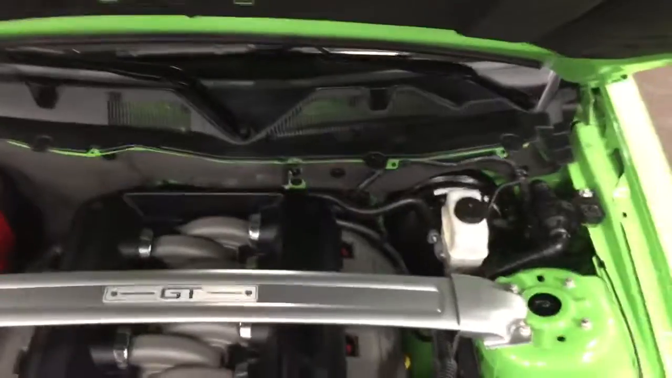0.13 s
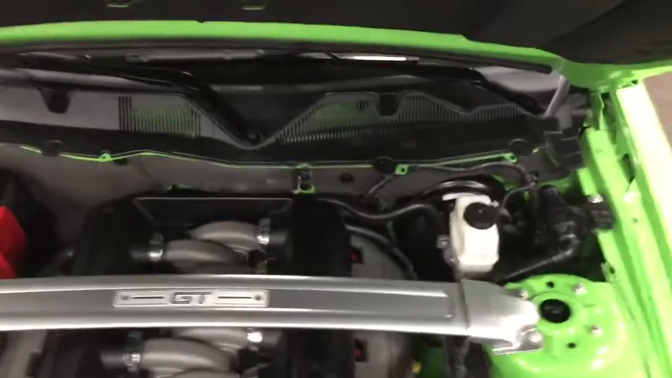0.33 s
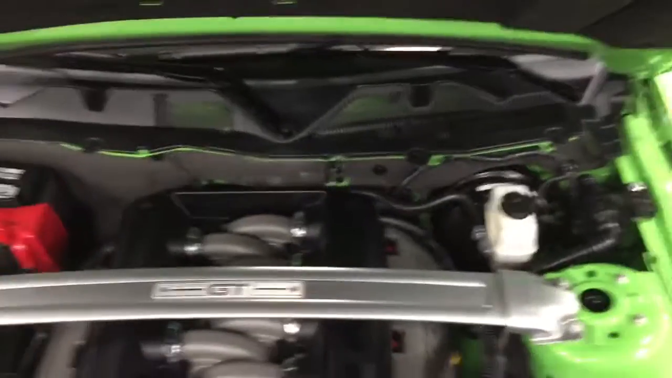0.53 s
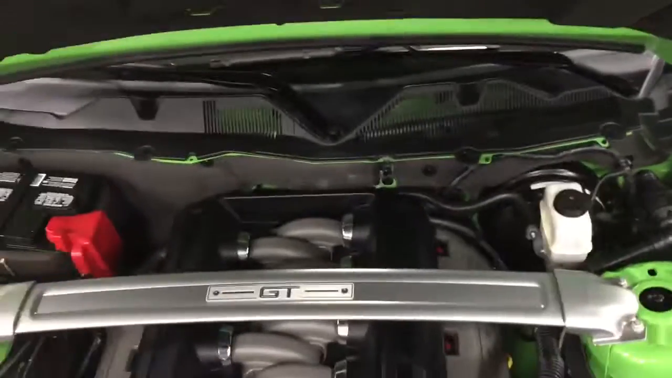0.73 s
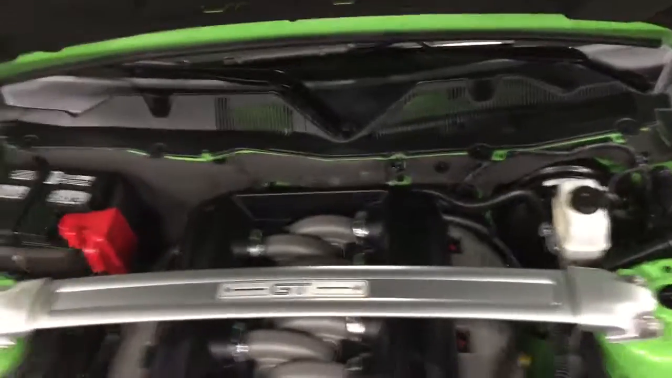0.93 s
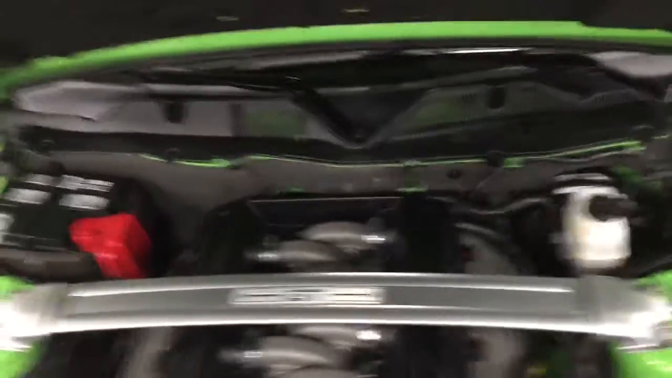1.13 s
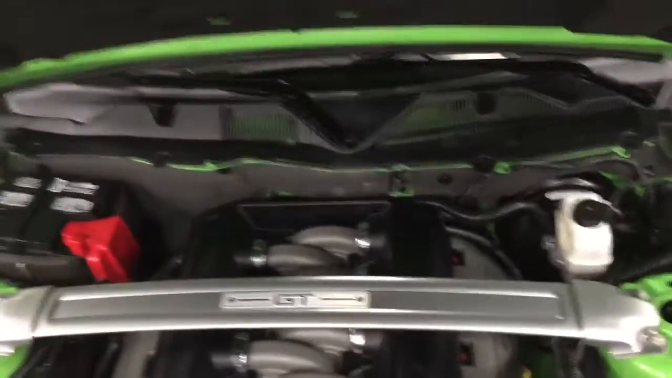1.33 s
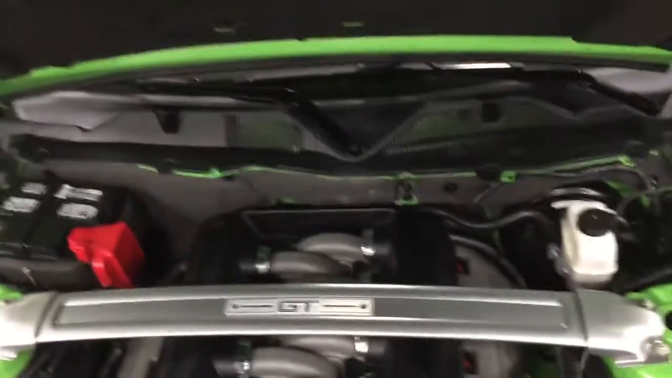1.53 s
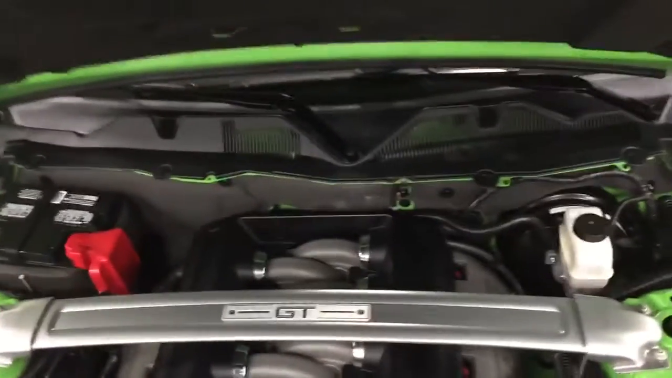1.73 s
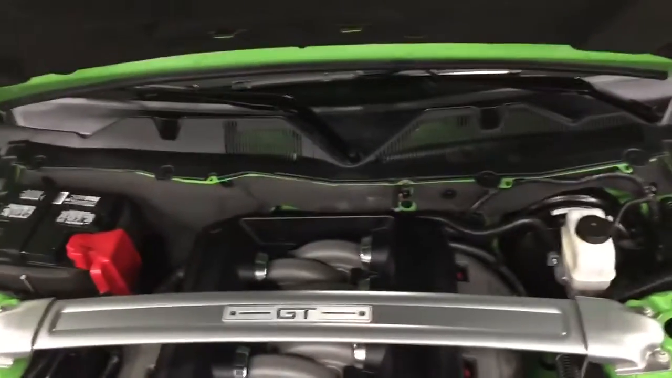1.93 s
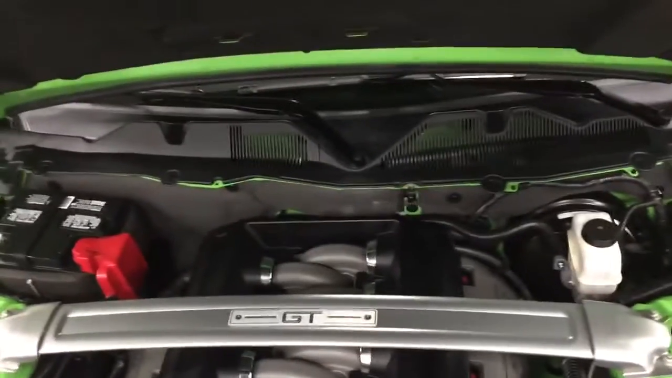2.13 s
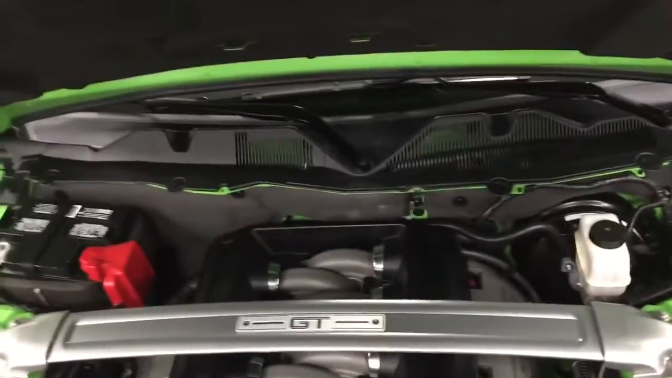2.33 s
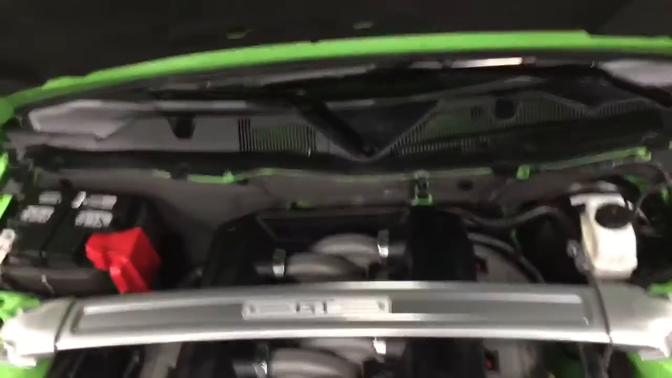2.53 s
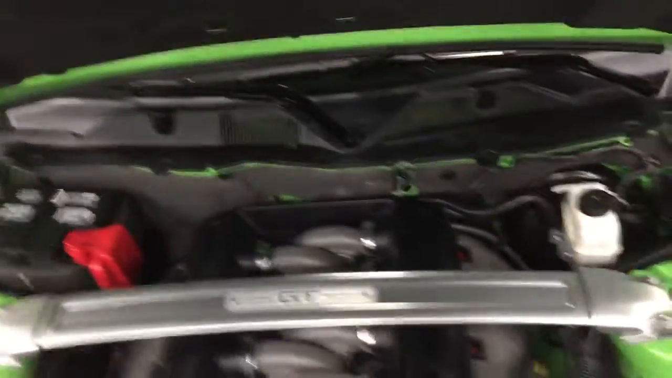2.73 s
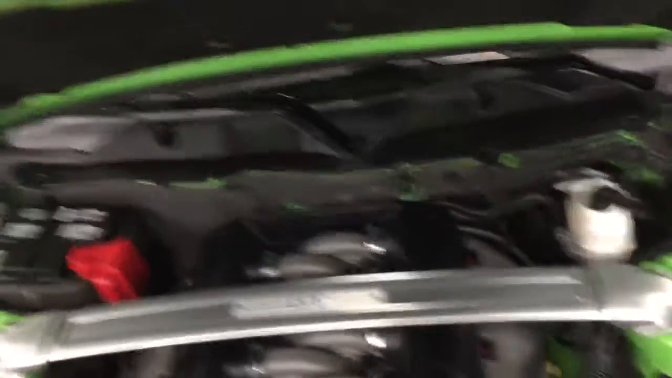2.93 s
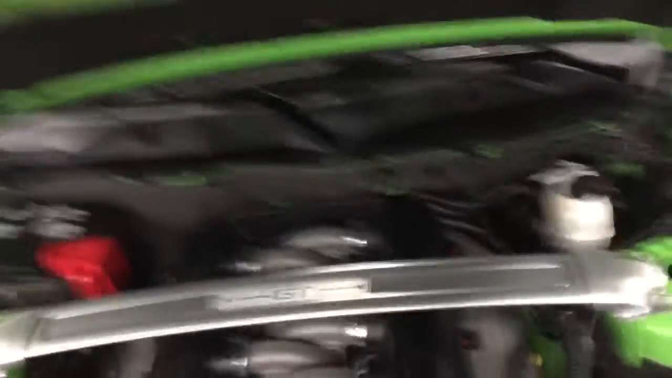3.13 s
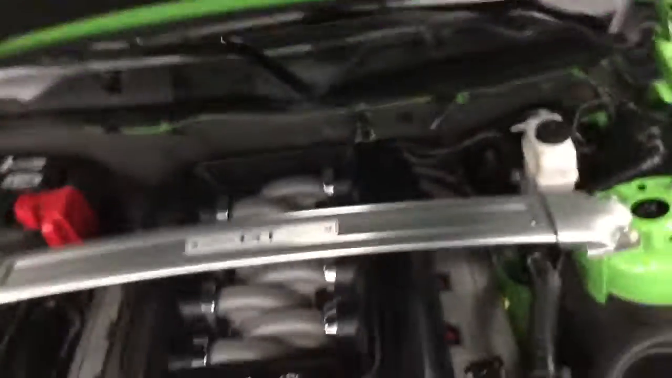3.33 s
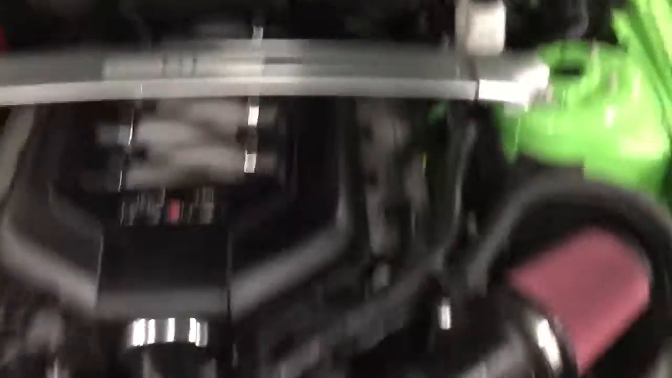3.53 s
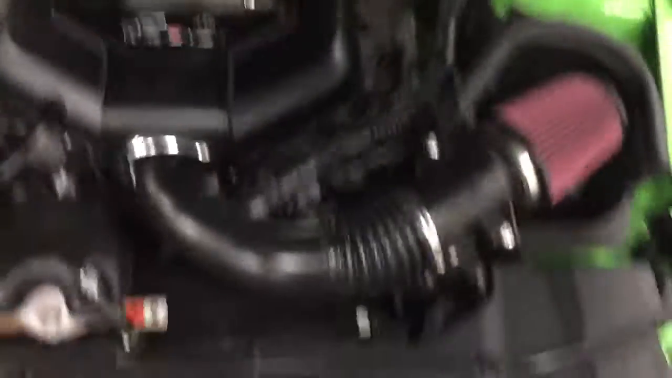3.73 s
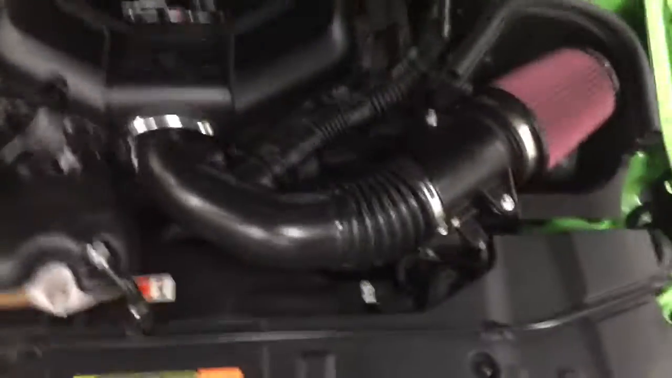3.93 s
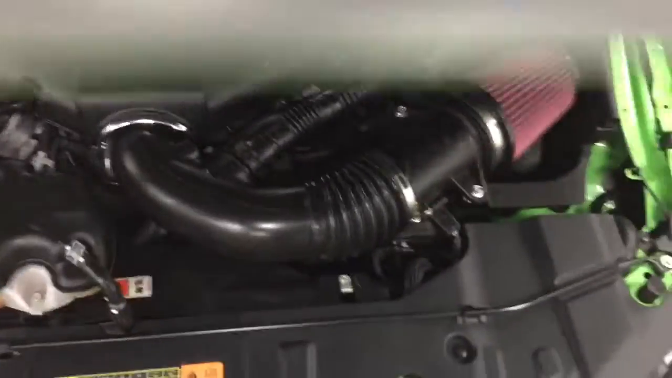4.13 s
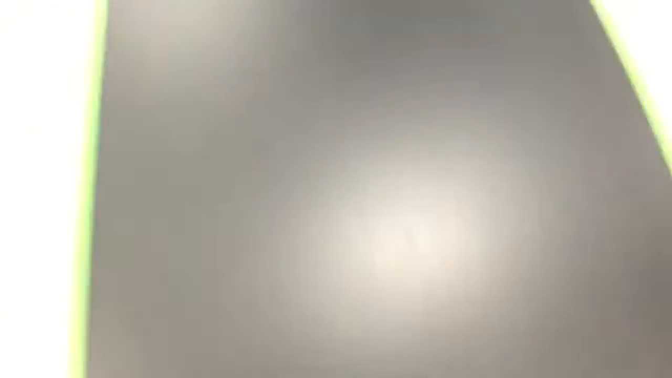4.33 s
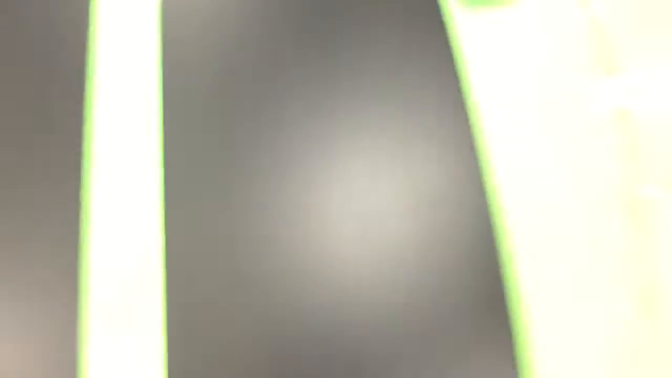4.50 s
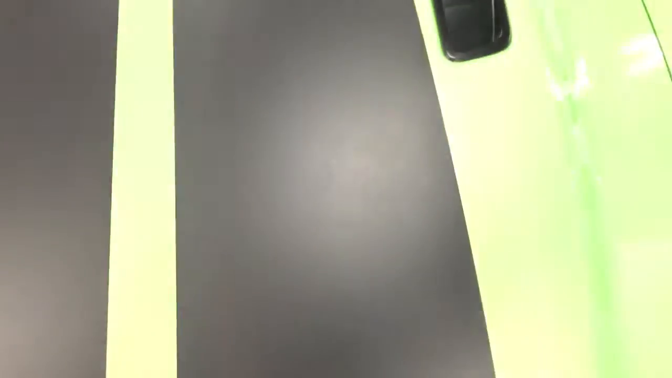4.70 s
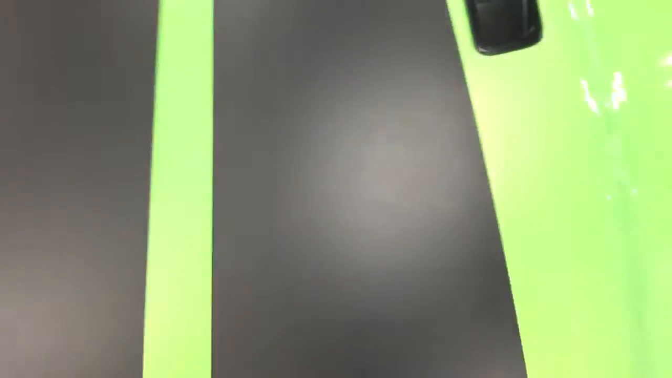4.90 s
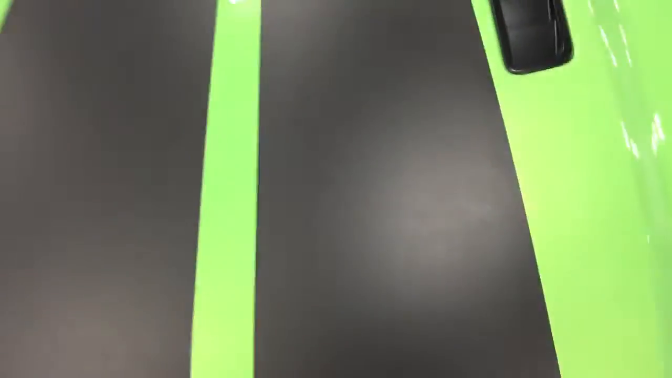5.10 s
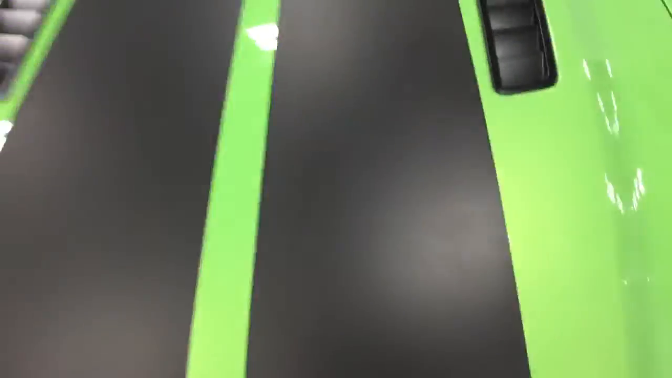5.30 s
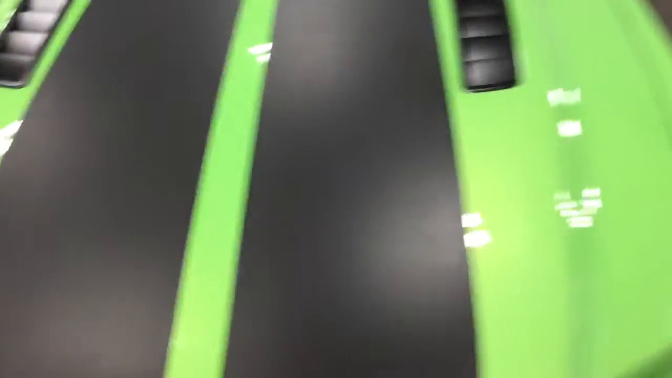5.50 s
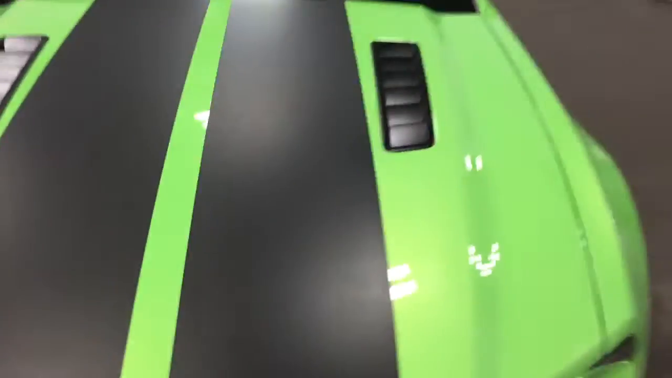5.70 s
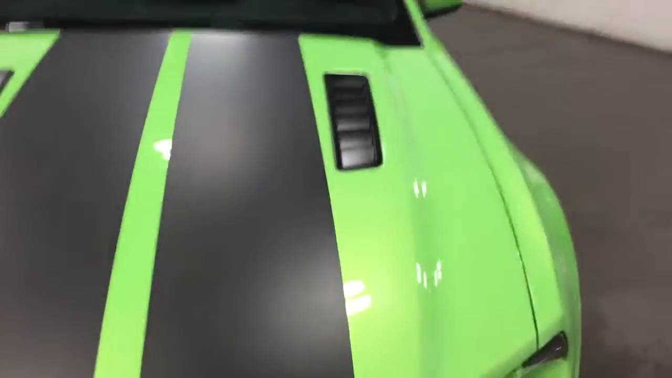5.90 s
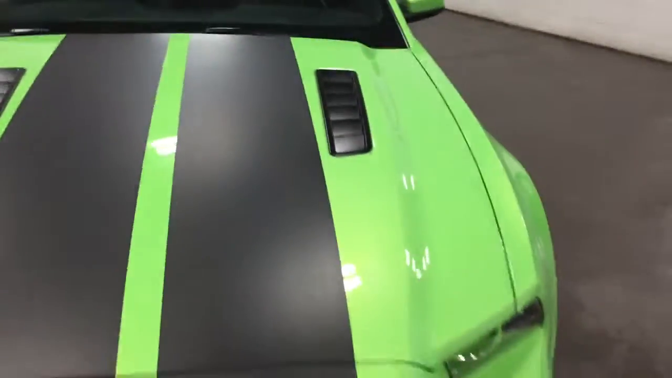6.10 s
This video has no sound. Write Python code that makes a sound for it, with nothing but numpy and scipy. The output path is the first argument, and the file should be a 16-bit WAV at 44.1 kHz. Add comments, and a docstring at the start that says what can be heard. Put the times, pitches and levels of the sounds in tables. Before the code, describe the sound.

A hand-held camera creaks and rubs softly for the first second or so, over the faint low rumble of a large, hard-walled showroom. From about 1.3 to 2.6 seconds a car's prop rod is unhooked and rattles into its holder: uneven, lightly ringing metal knocks with tiny scrapes and dull thumps of the hood panel, sharpest at 1.7 seconds and clustered around 2.2. Between about 2.8 and 4 seconds the fingers shift on the camera with small hollow ticks and rubs. At 4.6 seconds the hood falls with a slight low puff of air and slams onto its latch. This booming metal crash is by far the loudest sound and slightly overloads the microphone. Its echo fades over about a second, leaving quiet room tone and a couple of faint hand bumps around 6 seconds.

```python
"""A car hood is lowered and slammed in a large, hard-walled showroom, heard from a hand-held camera.
First the camera's case creaks and rubs in the hand. The prop rod is unhooked and rattles into its
holder, ringing and thumping the panel, and the fingers shift again. Then the hood falls with a puff
of air and crashes on its latch: the panel booms, the peaks overload and the gain ducks.
The hall rings on, swelling twice as the far walls answer, under a few last bumps of the hand."""
import sys
import numpy as np
from scipy import signal
from scipy.io import wavfile
from scipy.ndimage import uniform_filter1d

SR = 44100
rng = np.random.default_rng(int(sys.argv[2]) if len(sys.argv) > 2 else 0)


def digitize_waveform(pressure):
    """Quantize a signal to 16-bit integers and store it at the path in sys.argv[1].

    Rows of a 2-D input are taken as channels; values are limited to [-1, 1].
    """
    field = np.atleast_2d(pressure).T
    bounded = np.clip(field, -1, 1)
    quanta = np.round(bounded * 32767).astype(np.int16)
    wavfile.write(sys.argv[1], SR, quanta)


N = 275757

# Levels are set ahead of the mix gains; each hit or rub scales its object's t60 by a ring factor.
# room tone, mostly low rumble: f/Hz, level/dB
ROOM_TONE_EQ = [(15, -35), (25, -13.5), (55, -6), (82, -11), (190, -12), (242, -7), (270, -20.5),
                (416, -25), (531, -29.5), (775, -26.5), (1560, -31), (14400, -51), (16000, -50)]
# tone of the reverb: f/Hz, level/dB
HALL_EQ = [(30, -5.5), (55, 2), (110, 4), (220, -4.5), (550, -8), (1000, -4.5), (1600, 3.5), (2600, 2),
           (4000, 1.5), (7000, -1), (10000, -2.5), (15000, -11)]
# reverb time: f/Hz, t60/s
HALL_DECAY = [(60, 1.1), (200, 1.0), (550, .8), (1300, 1.1), (3000, 1.4), (5500, 1.3), (9000, 0.97),
              (15000, 0.81)]
# swells sent back by the far walls: delay/s, width/s, boost/dB
WALL_SWELLS = [(.3, .075, 2.5), (.69, .04, 4)]

# resonances of the camera's case: f/Hz, level/dB, t60/s
CASE_MODES = [(181, -10, 0.063), (264, -4, 0.066), (367, -5, 0.18), (565, -4, 0.1), (667, -6, 0.049),
              (960, -8.5, 0.017), (1170, -2, 0.078), (1734, -4, 0.041), (1970, -5.5, 0.017)]
# tone of a tick on the case: f/Hz, level/dB
CASE_EQ = [(50, -7), (160, 8), (400, -0.5), (1200, -3), (2200, -2), (2900, -18), (4300, -10), (5700, -21.5),
           (7200, -14.5), (10000, -26.5), (15000, -23.5)]
# noisy ring of the case: f/Hz, t60/s
CASE_DECAY = [(100, 0.53), (400, 0.2), (1200, 0.092), (2500, .035), (6000, 0.015), (15000, 0.019)]
# the case creaks in the hand: t/s, level/dB, relative treble/dB
CASE_CREAKS = [(.01, -31.5, -4.5), (.031, -24.5, -10.5), (.074, -25.5, -15), (0.162, -27, -6),
               (.254, -39, -36), (.385, -31.5, -11), (.468, -35, -21), (0.615, -35.5, -35),
               (.738, -42, -34), (.932, -46, -22), (1.04, -36.5, -26), (1.074, -33, -29),
               (1.16, -29, -23.5), (1.252, -39, -27), (1.269, -35, -33), (2.557, -33.5, -25),
               (2.828, -31.5, -46.5), (2.931, -39.5, -41), (3.114, -53, -24), (3.151, -36, -16),
               (3.253, -30, -6), (3.562, -25, -15), (3.568, -25, -16), (3.619, -47.5, -16),
               (3.757, -44, -25), (3.835, -44, -6), (3.858, -44, -16), (3.964, -49.5, -16)]
# fingers slip on the case: t/s, length/s, level/dB, slip rate/Hz, relative treble/dB
FINGER_SLIPS = [(0.0, 0.014, -44.5, 880, -12.5), (.04, 0.049, -41, 650, -9.5), (.166, 0.069, -44, 260, -11),
                (.62, 0.094, -48.5, 80, -42), (.745, .1, -50, 80, -49), (1.278, 0.064, -47.5, 200, -29),
                (3.262, 0.082, -50.5, 900, -12), (3.379, 0.05, -47.5, 890, -13.5),
                (3.438, 0.036, -52.5, 1010, -15), (3.47, 0.15, -57.5, 900, -17),
                (3.644, 0.033, -49, 174, -23.5), (3.762, 0.061, -50.5, 170, -23),
                (4.004, 0.14, -56, 300, -26)]
# tone of skin rubbing the case: f/Hz, level/dB
SLIP_EQ = [(50, -9.5), (160, 7.5), (400, -0.5), (700, -3.5), (1100, 0), (1750, -4.5), (2200, -9.5),
           (2800, -19.5), (3800, -23), (5000, -26), (15000, -37.5)]
# small snaps under the fingers: t/s, level/dB, t60/s
FINGER_CLICKS = [(3.171, -32, .008), (3.214, -40, 0.078), (3.238, -40.5, 0.023), (4.597, -56.5, .02),
                 (6.149, -63, .01)]
# tone of those snaps: f/Hz, level/dB
CLICK_EQ = [(100, -4.5), (500, 0.5), (1200, -4.5), (3800, -20.5), (5200, 3), (6800, -15.5), (12500, -18),
            (16000, -17)]
# low thumps of the hood panel under the rod's knocks, and bumps of the hand on the case:
# t/s, level/dB, f/Hz, relative knock on the case/dB
DULL_THUMPS = [(.031, -30, 396, -5.5), (.073, -23, 367, -12.5), (.079, -26, 91, -13),
               (1.548, -29, 125, -40), (1.749, -22.5, 78, -25), (2.185, -29, 95, -27),
               (2.452, -37, 138, -30), (3.172, -40, 113, -10.5), (3.566, -29.5, 209, -9.5),
               (5.976, -44.5, 75.8, -8.5), (6.04, -48, 100.3, -11)]

# resonances of the rod and the panel it stands on: f/Hz, level/dB, t60/s
ROD_MODES = [(122.4, -8, .22), (202.4, -6, 0.21), (266.2, -5, 0.16), (355, -9, .12), (408, -6.5, 0.043),
             (567, -7.5, .14), (714.7, -2, 0.11), (822, -7.5, 0.097), (938, -6.5, 0.23), (1070, -4.5, 0.11),
             (1246, -3, 0.016), (1400, -7.5, 0.044), (1450, -10, 0.042), (2560, -24.5, .1), (2890, -15, .1)]
# tone of contact with the rod: f/Hz, level/dB
ROD_EQ = [(40, -20.5), (80, -22.5), (115, 1.5), (400, -0.5), (800, 2.5), (1450, 1.5), (2000, -8.5),
          (3000, -11), (5000, -19), (9000, -26.5), (15000, -30)]
# noisy ring of the rod: f/Hz, t60/s
ROD_DECAY = [(100, 0.48), (400, 0.1), (1200, 0.12), (3000, 0.094), (8000, 0.11), (15000, 0.045)]
# the rod hits hood and holder: t/s, level/dB, relative bass/dB, relative treble/dB
ROD_KNOCKS = [(1.339, -26.5, -4, -10), (1.347, -20, -9.5, -7), (1.471, -32, -5, -18.5),
              (1.51, -26.5, 0, -20), (1.542, -32, 7, -8), (1.584, -39.5, 3, -12), (1.7452, -7.5, -7, -10),
              (1.776, -19, -7.5, -8.5), (2.09, -24.5, -4, -10), (2.142, -27, 4.5, -10),
              (2.176, -21, 1, -11), (2.215, -12.5, -11.5, -9.5), (2.2484, -16, -6, -16.5),
              (2.413, -30.5, 0.5, -10.5), (2.446, -18, -0.5, -9), (2.598, -27.5, -2, -20)]
# rod, hinges and catch scrape: t/s, length/s, level/dB, relative treble/dB
METAL_SCRAPES = [(1.463, 0.011, -51.5, -22), (1.697, 0.05, -49, -21.5), (2.072, 0.02, -44.5, -25),
                 (2.087, 0.044, -37, -11), (2.186, 0.043, -37.5, -19.5), (2.401, 0.024, -47.5, -15),
                 (2.59, 0.0096, -52.5, -19), (4.409, .04, -57.5, -50), (4.483, 0.14, -64.5, -45),
                 (4.559, 0.016, -57.5, -11.5), (4.577, 0.05, -54.5, -27)]

# the hood meets latch, catch and rubber stops: t/s, level/dB, ring factor, treble shelf/dB
SLAM_HITS = [(4.618, -1.5, .22, 6), (4.63, -5.5, 0.45, 4), (4.6404, -4, .75, 1.5), (4.664, -9, 0.86, -2)]
# tone of the crash: f/Hz, level/dB
SLAM_EQ = [(30, -2), (100, 6.5), (300, 0.5), (600, -0.5), (1400, -3), (2400, -12), (5500, -16), (8000, -22),
           (15000, -23.5)]
# ring of the crash: f/Hz, t60/s
SLAM_DECAY = [(60, 0.22), (300, 0.26), (1200, 0.21), (4000, 0.14), (8000, 0.14), (15000, 0.094)]
# resonances of hood, latch and car body: t/s, f/Hz, peak/dB, rise/s, t60/s
HOOD_MODES = [(4.611, 2060, -15.5, 0.0087, 0.031), (4.6185, 220, 9, 0.0017, 0.12),
              (4.642, 259, -7, 0.0055, 0.2), (4.62, 168, -5, 0.0074, .17), (4.645, 320, -4, 0.014, 0.096),
              (4.643, 54, -4, .018, 0.21), (4.645, 80, -9.5, .012, 0.25), (4.635, 101, -9, 0.011, 0.27),
              (4.64, 322, -29.5, .01, 1.1), (4.63, 612, -20, 0.0024, 0.31)]


def gain_of(db):
    """Decibels to amplitude."""
    return 10 ** (np.asarray(db) / 20)


def decay(t, t60):
    """An envelope that falls 60 dB in t60 seconds."""
    return np.exp(-np.log(1000) * t / t60)


def unit_rms(x):
    """Scales to rms 1."""
    return x / np.sqrt(np.mean(x ** 2) + 1e-20)


def unit_peak(x, size=300):
    """Scales so that the loudest few milliseconds have rms 1."""
    return x / np.sqrt(uniform_filter1d(x ** 2, size, mode="constant").max() + 1e-20)


def curve_at(points, hz):
    """Reads a curve on a log-frequency axis."""
    f, value = np.transpose(points)
    return np.interp(np.log(hz + 1), np.log(f + 1), value)


def add(mix, s, sound):
    """Mixes a sound in at time s."""
    part = mix[max(round(s * SR), 0):][:len(sound)]
    part += sound[:len(part)]


def band(x, hz, kind, order=4):
    """Causal low-, high- or band-pass."""
    return signal.sosfilt(signal.butter(order, hz, kind, fs=SR, output="sos"), x)


def equalise(x, eq, size=4096):
    """Minimum-phase EQ, so that attacks stay sharp."""
    log_gain = np.log(gain_of(curve_at(eq, abs(np.fft.fftfreq(size, 1 / SR)))))
    taps = np.fft.ifft(np.exp(signal.hilbert(log_gain).conj())).real
    return signal.oaconvolve(x, taps[:size // 2])[:len(x)]


def ringing_noise(decays, ring, count, size=128):
    """Countless overlapping modes: noise in which each band dies at its own speed."""
    hz, t, spectrum = signal.stft(rng.standard_normal(count), SR, nperseg=size)
    t60 = np.maximum(curve_at(decays, hz)[:, None] * ring, 1e-3)
    return signal.istft(spectrum * decay(t, t60), SR, nperseg=size)[1][:count]


def impacts(rows, modes, eq, decays, modes_db, tick_db, tick_s, bass_hz, treble_hz, count=16384):
    """Hits on one object: heavy ones bring out its bass, hard ones its treble."""
    out, t = np.zeros(N), np.arange(count) / SR
    for s, db, bass_db, treble_db, ring in rows:
        ring = max(ring, .2)
        # each hit lands on another spot and pushes the modes in other directions
        tones = sum(rng.choice([-1, 1]) * gain_of(level) * np.sin(2 * np.pi * hz * t)
                    * decay(t, t60 * ring) for hz, level, t60 in modes)
        attack = 1 + gain_of(tick_db) * np.exp(-t / tick_s)
        noise = equalise(attack * ringing_noise(decays, ring, count), eq)
        hit = unit_peak(noise) + gain_of(modes_db) * unit_peak(tones)
        body = unit_peak(band(hit, [bass_hz, treble_hz], "bandpass", order=6))
        bass = unit_peak(band(hit, bass_hz, "lowpass"))
        treble = unit_peak(band(hit, treble_hz, "highpass", order=8))
        add(out, s, gain_of(db) * (body + gain_of(bass_db) * bass + gain_of(treble_db) * treble))
    return out


def friction(rows, eq, decays, ring, uneven_db, treble_hz, count=4096):
    """Stick and slip: trains of tiny hits that swell and fade; slow ones tick evenly, fast ones blur."""
    out = np.zeros(N)
    for s, length, db, rate, treble_db in rows:
        gap_spread, force_spread = rng.standard_normal((count, 2)).T
        jitter = min(.15 + rate / 800, .7)
        slip_s = np.cumsum(np.exp(jitter * gap_spread)) / rate
        slip_s -= slip_s[0]
        inside = slip_s < length
        pressure = .25 + np.sin(np.pi * slip_s[inside] / length)
        train = np.zeros(round(length * SR) + count)
        train[(slip_s[inside] * SR).astype(int)] = pressure * gain_of(uneven_db * force_spread[inside])
        rung = signal.fftconvolve(train, ringing_noise(decays, ring, count))[:len(train)]
        rub = equalise(rung, eq)
        dull = unit_rms(band(rub, treble_hz, "lowpass", order=8))
        bright = unit_rms(band(rub, treble_hz, "highpass", order=8))
        makeup = np.sqrt(len(rub) / (length * SR))  # the level counts the stroke without its tail
        add(out, s, gain_of(db) * makeup * (dull + gain_of(treble_db) * bright))
    return out


def room_tone(level_db=-58.5):
    """The showroom's air: a steady bed of rumble and faint hiss."""
    return gain_of(level_db) * unit_rms(equalise(rng.standard_normal(N), ROOM_TONE_EQ))


def hall(send, build_s=0.018, blur=0.23, size=1024):
    """Countless paths turn each sound into a diffuse wash, which swells when the far walls answer."""
    frames = dict(fs=SR, nperseg=size, noverlap=size - size // 4)
    hz, t, spectrum = signal.stft(send, **frames)
    wash = signal.stft(rng.standard_normal(N), **frames)[2]
    blend = np.exp(-(np.log((hz[:, None] + hz[1]) / (hz + hz[1])) / blur) ** 2)  # smears narrow peaks
    power = blend / blend.sum(1, keepdims=True) @ abs(spectrum) ** 2
    walls_db = sum(db * np.exp(-((t - s) / width) ** 2) for s, width, db in WALL_SWELLS)
    swell = (1 - np.exp(-t / build_s)) * gain_of(walls_db)
    tail = (swell * decay(t, curve_at(HALL_DECAY, hz)[:, None])) ** 2
    wash_power = abs(signal.fftconvolve(power, tail / tail.sum(1).mean(), axes=1)[:, :len(t)])
    wash *= np.sqrt(wash_power) / np.std(wash) * gain_of(curve_at(HALL_EQ, hz))[:, None]
    return signal.istft(wash, **frames)[1][:N]


def case_hits(rows):
    """Short, hollow ticks from the modes of the camera's case."""
    return gain_of(-4) * impacts(rows, CASE_MODES, CASE_EQ, CASE_DECAY, modes_db=-1.0,
                                 tick_db=-1.0, tick_s=0.0037, bass_hz=380, treble_hz=2650)


def case_creaks(usual_db=-36, usual_bass_db=-2, bass_slope=.5, ring=0.85, settle_s=.024, settle_db=-15):
    """The case gives with a tick and settles with a weaker one; soft creaks are rounder."""
    rows = []
    for s, db, treble_db in CASE_CREAKS:
        settle_at = s + settle_s * np.exp(.15 * rng.standard_normal())
        for start, level in [(s, db), (settle_at, db + settle_db)]:
            bass_db = usual_bass_db - bass_slope * (level - usual_db)
            rows.append((start, level, bass_db, treble_db, ring))
    return case_hits(rows)


def finger_clicks(count=4096):
    """Short bright snaps of noise under the fingers."""
    out, t = np.zeros(N), np.arange(count) / SR
    for s, db, t60 in FINGER_CLICKS:
        snap = rng.standard_normal(count) * decay(t, t60)
        add(out, s, gain_of(db) * unit_peak(equalise(snap, CLICK_EQ)))
    return out


def case_knocks(bass_db=13.6, treble_db=-19.5, ring=.75):
    """A dull knock of the case goes with each thump: clear for the hand's, very faint for the panel's."""
    return case_hits([(s, db + knock_db, bass_db, treble_db, ring) for s, db, _, knock_db in DULL_THUMPS])


def loose_grip(case, from_s=3.245, to_s=3.99, fade_s=.007, level_db=5.5):
    """A looser grip frees a bright resonance of the case."""
    t = np.arange(N) / SR
    looseness = np.clip(np.minimum(t - from_s, to_s - t) / fade_s, 0, 1)
    return gain_of(level_db) * looseness * band(case, [1950, 2480], "bandpass", order=1)


def handling():
    """Creaks, knocks and finger slips, coloured by the grip on the case, with clicks on top."""
    case = case_creaks() + case_knocks()
    case += friction(FINGER_SLIPS, SLIP_EQ, CASE_DECAY, ring=0.69, uneven_db=1.0, treble_hz=2545)
    return case + loose_grip(case) + finger_clicks()


def dull_thumps(rise_s=0.012):
    """The panel thumps under the rod, or the hand bumps the case: a brief, low tone with a soft attack."""
    out, t = np.zeros(N), np.arange(SR) / SR
    envelope = t / rise_s * np.exp(1 - t / rise_s)
    for s, db, hz, _ in DULL_THUMPS:
        add(out, s, gain_of(db) * envelope * np.sin(2 * np.pi * hz * t))
    return out


def rod_scrapes(slip_hz=660):
    """Rod, hinges and catch stick and slip in short, gritty strokes."""
    rows = [(s, length, db, slip_hz, treble_db) for s, length, db, treble_db in METAL_SCRAPES]
    return friction(rows, ROD_EQ, ROD_DECAY, ring=0.52, uneven_db=3.0, treble_hz=3000)


def rod_knocks(usual_db=-18, usual_ring=1.54, halving_db=12,
               rebound_s=.0095, rebound_db=-11, rebound_ring=.45):
    """The springy rod rebounds once after each knock; hard knocks press it home and ring less."""
    rows = []
    for s, db, bass_db, treble_db in ROD_KNOCKS:
        ring = usual_ring * .5 ** (max(db - usual_db, 0) / halving_db)
        rows.append((s, db, bass_db, treble_db, ring))
        rows.append((s + rebound_s, db + rebound_db, bass_db, treble_db, ring * rebound_ring))
    return gain_of(-1.5) * impacts(rows, ROD_MODES, ROD_EQ, ROD_DECAY, modes_db=-4.5,
                                   tick_db=2.0, tick_s=0.015, bass_hz=370, treble_hz=2778)


def air_puff(fall_s=4.3, shut_s=4.617, cushion_s=.003, level_db=-24.5, band_hz=(70, 280)):
    """The falling hood squeezes out a low puff that grows as the gap closes and stops once it is shut."""
    t = np.arange(N) / SR
    speed = np.clip((t - fall_s) / (shut_s - fall_s), 0, 1)
    gap = 1 + np.maximum(shut_s - t, 0) / cushion_s
    release = np.exp(-np.maximum(t - shut_s, 0) / cushion_s)
    wind = unit_rms(band(rng.standard_normal(N), band_hz, "bandpass", order=2))
    return gain_of(level_db) * speed / gap * release * wind


def hood_slam():
    """The latch crashes in quick hits; the panel booms and the car's body follows."""
    out, t = np.zeros(N), np.arange(SR) / SR
    for s, db, ring, treble_db in SLAM_HITS:
        crash = unit_peak(equalise(ringing_noise(SLAM_DECAY, ring, count=SR), SLAM_EQ))
        add(out, s, gain_of(db) * equalise(crash, [(1000, 0.011), (4000, treble_db)]))
    for s, hz, db, rise, t60 in HOOD_MODES:
        envelope = np.minimum(t / rise, 1) * decay(np.maximum(t - rise, 0), t60)
        add(out, s, gain_of(db) * envelope * np.sin(2 * np.pi * hz * t))
    return out


def gain_control(x, threshold_db=-15, slope=0.52, recovery_db_per_s=7, react_s=0.038):
    """The camera ducks just after a long, loud sound, then slowly comes back up."""
    lag = np.exp(-1 / (react_s * SR))
    power_db = 10 * np.log10(signal.lfilter([1 - lag], [1, -lag], np.minimum(x ** 2, 1)) + 1e-12)
    recovery = recovery_db_per_s * np.arange(N) / SR
    held_db = np.maximum.accumulate(power_db + recovery) - recovery  # holds each peak, then sinks
    over_db = np.maximum(held_db - threshold_db, 0)
    return x / gain_of(slope * signal.lfilter([1 - lag], [1, -lag], over_db))


def scene():
    """Rod and hood sound into the hall; the hand reaches the microphone mostly through the case."""
    rod = band(rod_knocks() + rod_scrapes(), 58, "highpass", order=2)  # the rod's sound carries nothing below about 58 Hz
    rod_far = equalise(rod, [(2200, -1), (4500, -4.5), (12000, -6)])  # the raised hood shades its treble
    hand = handling()
    hand_lows = band(hand, 300, "lowpass", order=2)
    hood = hood_slam() + air_puff()
    send = gain_of(-18.5) * rod_far + gain_of(-19.5) * hood
    send += gain_of(-26.5) * hand + gain_of(-13) * hand_lows
    return (rod + hand + dull_thumps() + hood + hall(send) + room_tone())[None]


def record(dry, ceiling=.7, hardness=6, cutoff_hz=15900):
    """Gain control is too slow for the slam, so its peaks saturate; a steep low-pass trims the top."""
    ducked = gain_control(dry[0])
    saturated = ducked / (1 + abs(ducked / ceiling) ** hardness) ** (1 / hardness)
    lowpass = signal.firwin(255, cutoff_hz, window=("kaiser", 9), fs=SR)
    return signal.oaconvolve(saturated, lowpass, "same")[None]


dry = scene()
out = record(dry)
digitize_waveform(out)
```